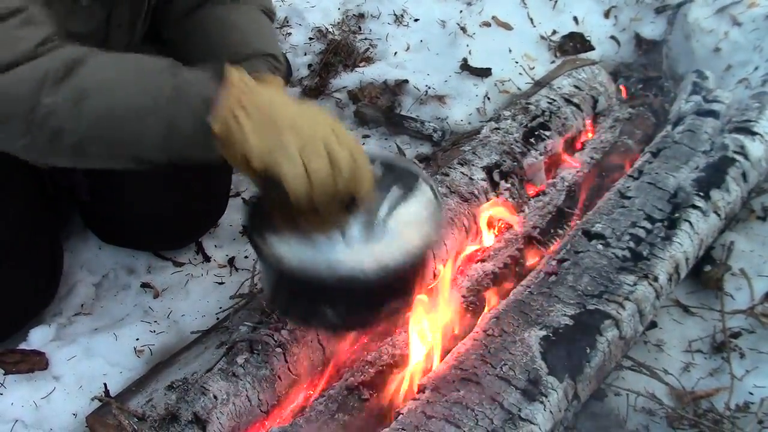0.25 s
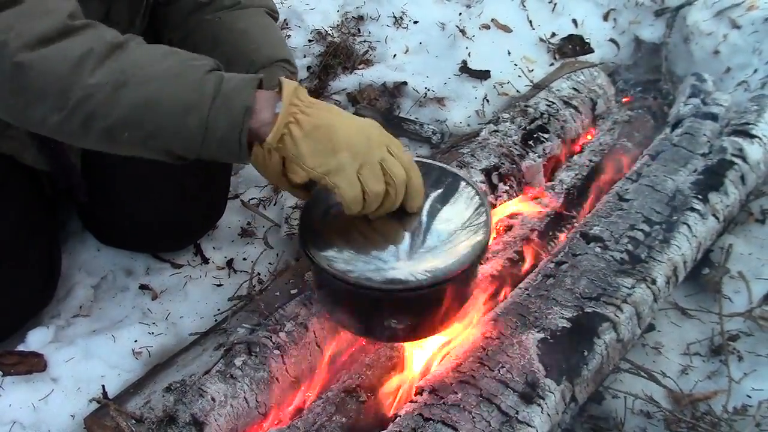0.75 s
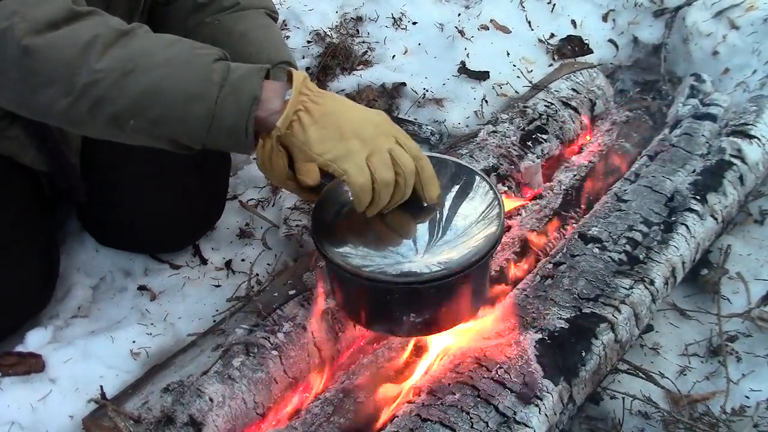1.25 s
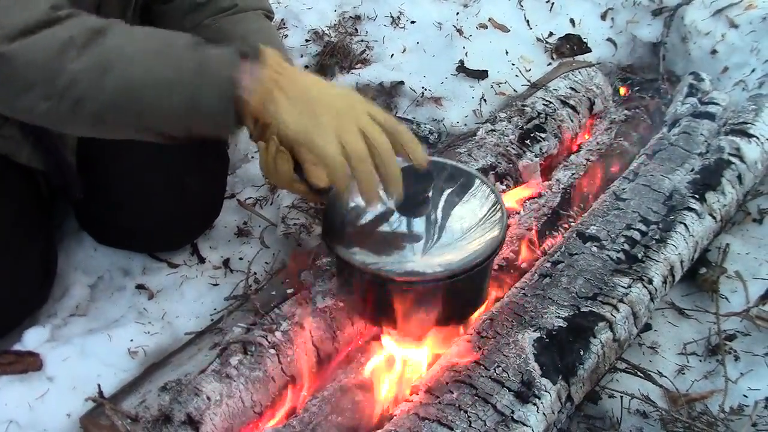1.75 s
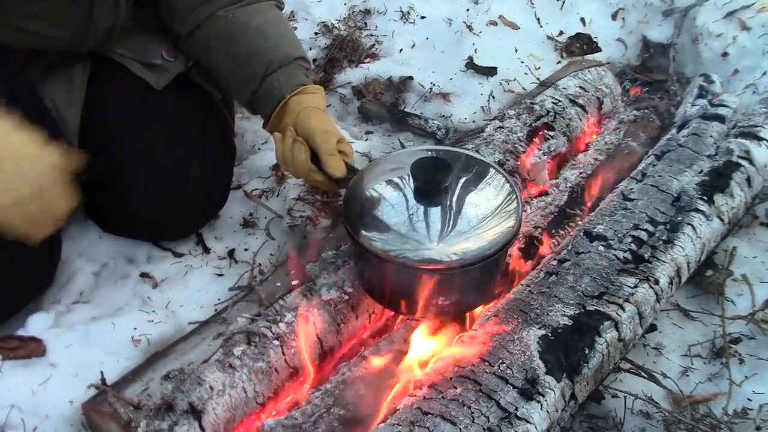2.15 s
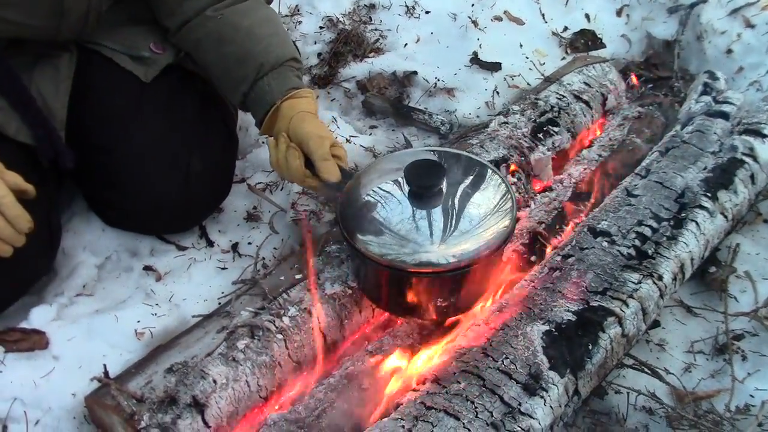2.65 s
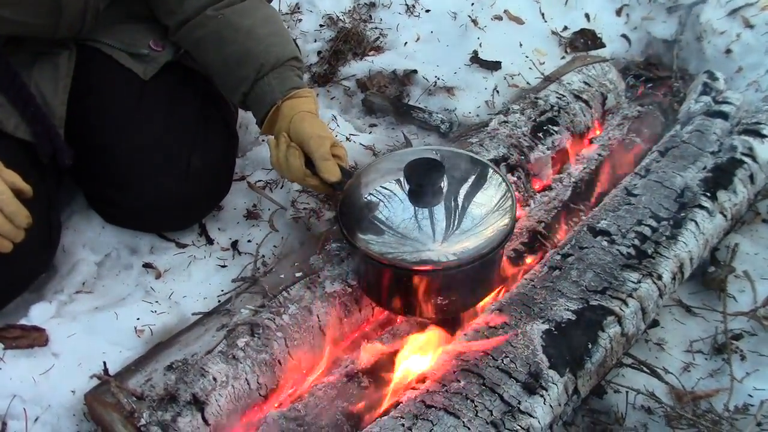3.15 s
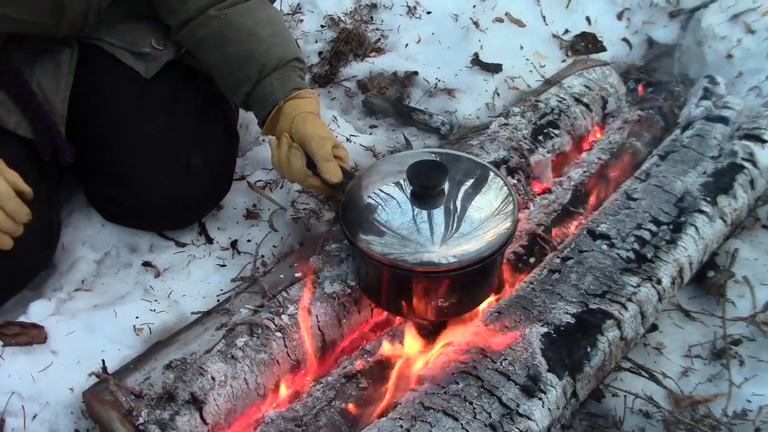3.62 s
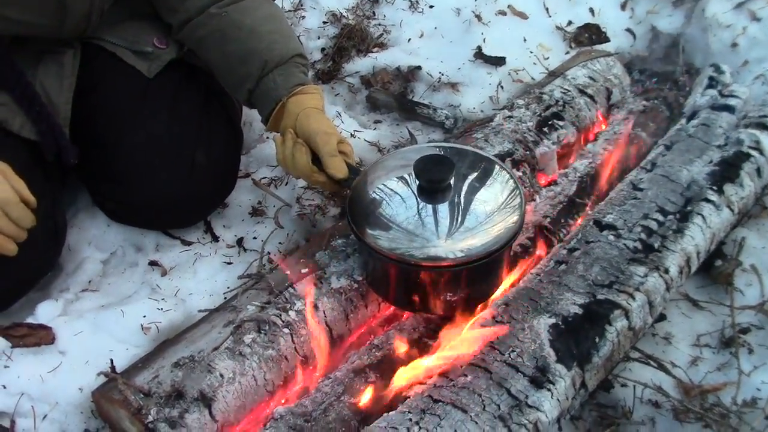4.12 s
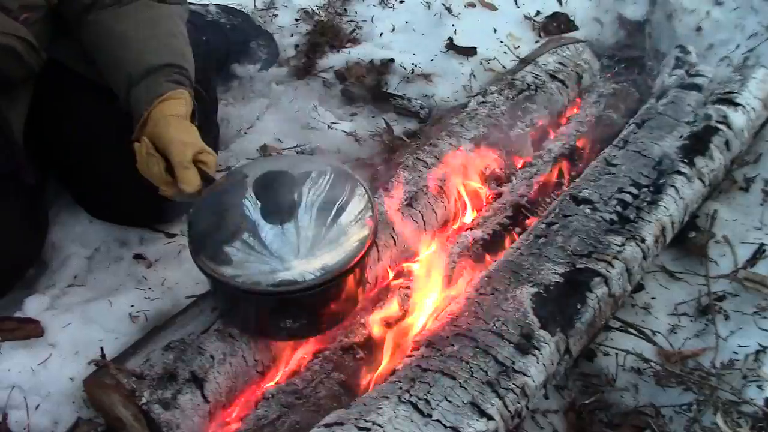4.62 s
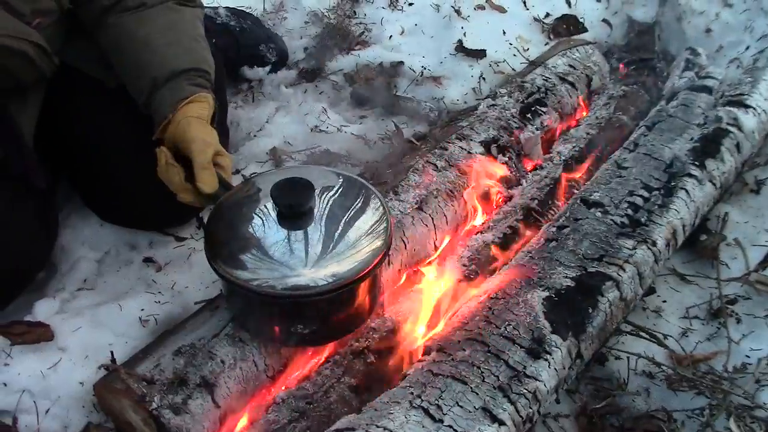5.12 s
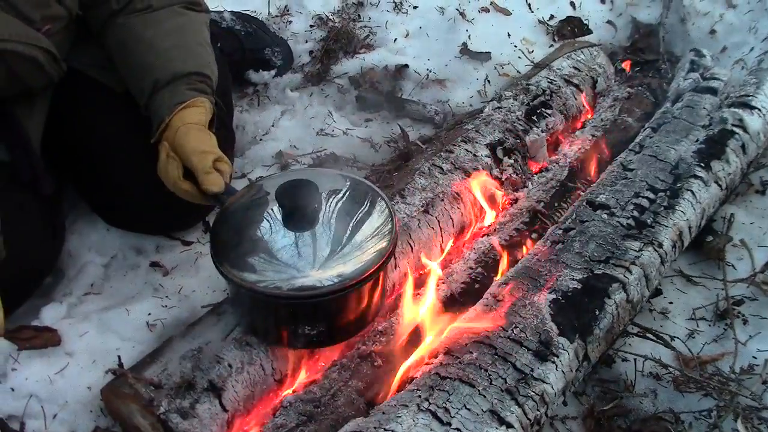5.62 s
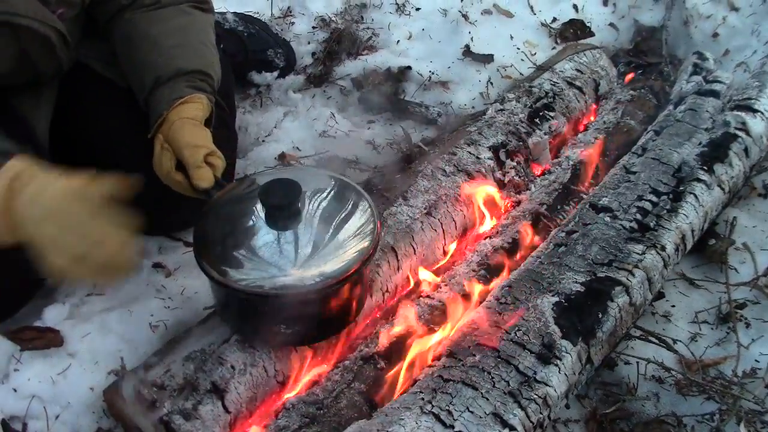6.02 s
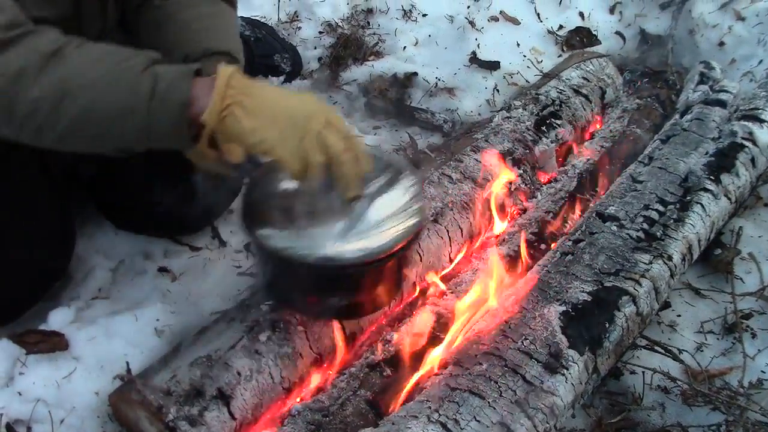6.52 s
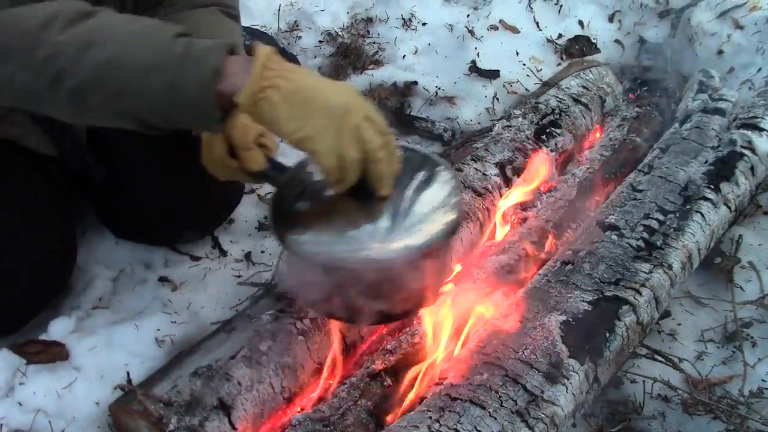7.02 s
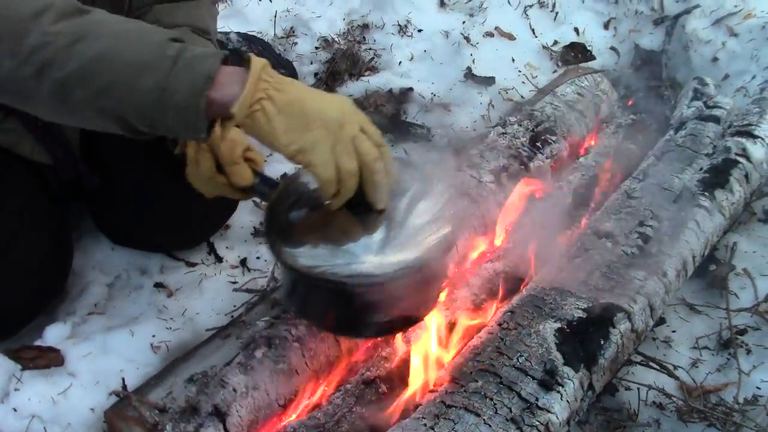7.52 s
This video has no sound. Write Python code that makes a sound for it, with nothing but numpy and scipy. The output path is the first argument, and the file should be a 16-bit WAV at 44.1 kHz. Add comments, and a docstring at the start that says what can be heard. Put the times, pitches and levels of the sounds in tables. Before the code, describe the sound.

Outdoors and close up, hard kernels swish back and forth in a shaken steel kettle, then settle. Oil sizzles and spits finely over soft fire flutter and small snaps, with a faint sleeve rustle. A brief dead silence cuts in, then corn pops sharply against the metal, pieces patter, steam hisses, and the lid clinks and rings, with popping thickening to the end.

```python
"""Campfire popcorn kettle

Kernels slide in a shaken, lidded steel kettle (swept click noise) over sizzling oil (jittered sines).
It rests while the fire flutters and snaps (filtered puffs and bursts). After a short silent gap kernels
burst (noise through kettle resonances), ricochet, and make the lid clink (damped modes) under steam."""
import sys
import numpy as np
from scipy import signal
from scipy.fft import rfft, irfft
from scipy.io import wavfile
from scipy.ndimage import uniform_filter1d

SR = 44100
rng = np.random.default_rng(int(sys.argv[2]) if len(sys.argv) > 2 else 0)


def waveform_to_disk(signal):
    """Save audio, clipped to [-1, 1], as 16-bit WAV at the path in sys.argv[1]."""
    frames = np.transpose(np.atleast_2d(signal))
    scaled = np.clip(frames, -1, 1) * 32767
    samples = np.round(scaled).astype(np.int16)
    wavfile.write(sys.argv[1], SR, samples)


N = 342392
TIME = np.arange(N) / SR
GAP_START_S, GAP_END_S = 4.338, 4.516


def undb(db):
    """Decibels to gain."""
    return 10 ** (np.asarray(db) / 20)


def unit(x):
    """Scale to rms 1."""
    return x / np.sqrt(np.mean(x ** 2) + 1e-20)


def fade(t, t60):
    """Exponential decay, 60 dB down at t60 seconds."""
    return np.exp(-np.log(1000) * t / t60)


def swell(s, rise_s, fall_s):
    """Gaussian rise to 1 at time s, Gaussian fall after it; widths are standard deviations."""
    return np.exp(-.5 * ((TIME - s) / np.where(TIME < s, rise_s, fall_s)) ** 2)


def add(out, s, sound):
    """Mix a sound in at time s."""
    i = max(int(s * SR), 0)
    out[i:i + len(sound)] += sound[:max(len(out) - i, 0)]


def band(x, edges_hz):
    """Causal band-pass."""
    return signal.sosfilt(signal.butter(3, edges_hz, "band", fs=SR, output="sos"), x)


def colour(x, spectrum):
    """Shape by (hz, db) points, straight lines over log frequency; rms 1."""
    hz, db = np.transpose(spectrum)
    bins_hz = np.maximum(np.arange(N // 2 + 1) * SR / N, 1)
    gain = undb(np.interp(np.log(bins_hz), np.log(hz), db))
    return unit(irfft(rfft(x) * gain, N))


def clicks(rate_hz, spread_db):
    """Tiny impacts at random moments, random in sign and uneven in size."""
    hits = rng.random(N) < rate_hz / SR
    sign = rng.choice([-1, 1], N)
    size_db = spread_db * np.clip(rng.standard_normal(N), -2, 2)
    return hits * sign * undb(size_db)


def droplets(start_s, end_s, pitch_hz, spread_octaves, count):
    """Tiny whistles at random moments; a wider pitch scatter also makes each one hissier."""
    out, t = np.zeros(N), TIME[:SR // 25]
    envelope = fade(t, .026) - fade(t, .003)
    jitter_rad = .1 + 2 * abs(spread_octaves)  # phase step per sample
    draws = np.clip(rng.standard_normal((count, 2)), -2, 2)
    for s, (size, detune) in zip(rng.uniform(start_s, end_s, count), draws):
        hz = min(pitch_hz * 2 ** (spread_octaves * detune), SR / 3)
        phase = 2 * np.pi * hz * t + jitter_rad * np.cumsum(rng.standard_normal(len(t)))
        add(out, s, undb(3 * size) * np.sin(phase) * envelope)
    return out


# damped resonances of kettle and enclosed air: pitch_hz, width_hz, level_db
KETTLE_MODES = [(206, 75, -4), (697, 164, 3), (1178, 220, -0.5), (1570, 59, -4.5), (1630, 51, 3),
                (1720, 470, -4.5), (2685, 75, 10.5), (3440, 160, -8), (6020, 210, 0.5), (7470, 340, 6.5),
                (8830, 1430, 1.5)]


def kettle(x, scatter_db=0):
    """Direct sound plus damped kettle resonances; scatter varies their levels with the place of the blow."""
    scatter = scatter_db * rng.standard_normal(len(KETTLE_MODES))
    out = x
    for (hz, width_hz, db), offset_db in zip(KETTLE_MODES, scatter):
        b, a = signal.iirpeak(hz, hz / width_hz, fs=SR)
        out = out + undb(db + offset_db) * signal.lfilter(b, a, x)
    return out


# thump, body, knock, crack, snap of a blow: low_hz, high_hz, t60_s, relative_db
BLOW_BANDS = [(67, 263, 0.022, 1.5), (528, 1780, 0.036, -2.5), (1208, 2560, 0.024, 2),
              (2050, 5200, 0.096, 1.5), (5560, 14300, 0.016, -1)]


def burst(strength_db, brightness_db_per_octave, thump_db, ring_hz, spike, tail_db, tail_t60_s,
          wall_share, ring_db=4.02, scatter_db=4):
    """Pressure spike, short decaying scatter and sparse rattle in five bands, plus one short resonance."""
    t = TIME[:SR // 4]
    pivot_hz, pivot_t60_s = 2500, .049

    def level_db(hz):
        """Strength tilted about the pivot."""
        return strength_db + brightness_db_per_octave * np.log2(hz / pivot_hz)

    ring_t60_s = pivot_t60_s * np.sqrt(pivot_hz / ring_hz)
    out = undb(level_db(ring_hz) + ring_db) * np.sin(2 * np.pi * ring_hz * t) * fade(t, ring_t60_s)
    for k, (low_hz, high_hz, t60_s, band_db) in enumerate(BLOW_BANDS):
        # the lowest band has its own level
        db = band_db + (thump_db if k == 0 else level_db(np.sqrt(low_hz * high_hz)))
        scatter, grit = rng.standard_normal((2, len(t)))
        rattle = unit(grit * (rng.random(len(t)) < .03))
        push = scatter * fade(t, t60_s) + undb(tail_db) * rattle * fade(t, tail_t60_s)
        push[0] -= spike
        blow = band((1 - wall_share) * push + wall_share * kettle(push, scatter_db), (low_hz, high_hz))
        # energy equal to rms 1 over 10 ms
        out = out + undb(db) * blow / np.sqrt(np.sum(blow ** 2) / (SR / 100))
    return out


# edges of the four level bands of the lid: edge_hz
LID_EDGES = [2400, 3000, 4300, 6100, 15500]
# strongest bending modes of the lid: pitch_hz, level_db, relative_t60 (x blow t60)
LID_MODES = [(2583, -5, 1), (2627, -4, .5), (2668, 0, 1.05), (2886, -20, 1.1), (3128, -18, .7),
             (3203, -11, .45), (3346, -9, .8), (3546, -13, 1), (3600, -14, 1), (3799, -5, 1.1),
             (4141, -12, 1), (4460, -7, .9), (4511, -9, .7), (4913, -6, .9), (5269, -9, .7),
             (5397, -8, .55), (5663, -18, .6), (5949, -10, .75), (6325, -18, .8), (6562, -16, .6),
             (7277, -12, .5), (7596, -19, .6), (7900, -17, .4), (8400, -19, .5), (8680, -20, .5),
             (10220, -23, .5), (11020, -24, .5), (11460, -22, .5), (12390, -26, .4)]


def lid(levels_db, t60_s, weak_db, weak_count):
    """Strong bending modes among weak short ones; random mode levels stand for the place of contact."""
    t = TIME[:SR * 3 // 5]
    weak_hz = rng.uniform(LID_EDGES[1], LID_EDGES[-1], weak_count)
    weak_levels_db = weak_db - 5 * np.log2(weak_hz / LID_EDGES[1])
    weak = np.transpose([weak_hz, weak_levels_db, np.full(weak_count, .55)])
    hz, db, life = np.vstack([LID_MODES, weak]).T[:, :, None]
    size, phase = rng.standard_normal((2, len(hz), 1))
    tones = np.sin(2 * np.pi * (hz * t + phase))
    modes = undb(db + 3.9 * size) * fade(t, t60_s * life) * tones
    out = 0
    for level_db, low_hz, high_hz in zip(levels_db, LID_EDGES, LID_EDGES[1:]):
        # the loose rim chatters on the pot and roughens the ring
        chatter = 1 + .13 * unit(band(rng.standard_normal(len(t)), (20, 300)))
        group = chatter * modes[((hz >= low_hz) & (hz < high_hz)).ravel()].sum(axis=0)
        out = out + undb(level_db) * group / np.std(group[:SR // 40])  # level over the first 25 ms
    return out


# resting lid, damped once the glove presses on it: time_s, t60_s
LID_DAMPING = [(6.1, 0.98), (6.3, 0.84)]
# kernels bursting or hitting the wall, strengths before trim; ring_hz depends on the place of the blow:
# start_s, strength_db, brightness_db_per_octave, thump_db, ring_hz
KERNELS = [(4.5176, -35.5, -4.6, -37, 7730.0), (4.5637, -46, 5.5, -48, 2750.0),
           (4.609, -30.0, 2, -40, 1650.0), (4.623, -56, 8, -65, 4480.0), (4.6549, -27.5, 0.5, -39, 1650.0),
           (4.724, -45, 3.5, -41.5, 1660.0), (4.7315, -39.5, 3.1, -47, 1650.0),
           (4.8208, -31.5, 3, -44, 7700.0), (4.8839, -33, -4.5, -43, 1580.0),
           (4.8933, -44.5, 7.5, -57, 1670.0), (4.99, -47.5, 2.5, -32, 1630.0),
           (5.2439, -35.5, 0, -37.5, 9010.0), (5.2972, -40.5, -4, -46, 3550.0),
           (5.4363, -41, 0.2, -40, 2880.0), (5.538, -35.5, 5, -36, 7530.0), (5.6048, -36, 0, -41, 4120.0),
           (5.6153, -35.5, 4.5, -50, 5610.0), (5.6634, -37.5, 4.5, -41.5, 1660.0),
           (5.8158, -30.0, 0, -26, 8810.0), (5.8412, -33, -0.5, -34.5, 4460.0),
           (5.976, -30, 1.5, -43.5, 3800.0), (6.0307, -35.5, 5.5, -45, 7270.0),
           (6.0596, -38, 3.5, -45, 7280.0), (6.177, -39.5, -0.8, -59, 2920.0),
           (6.21, -27, -2.5, -49, 1750.0), (6.223, -34.5, 2.3, -33, 1340.0),
           (6.346, -33.5, 1.5, -70, 2750.0), (6.3514, -33, -3.5, -25.5, 2750.0),
           (6.376, -35, 1, -55, 1690.0), (6.4098, -33.5, -0.7, -27, 7190.0),
           (6.4917, -40, 1.5, -42, 7170.0), (6.5174, -43.5, -1.5, -35, 7910.0),
           (6.6099, -52.5, 4.5, -81, 9030.0), (6.7993, -33.5, -5.5, -35, 1560.0),
           (6.8948, -27.5, 1.1, -29, 8830.0), (6.954, -26.5, 2.5, -38, 7150.0),
           (7.0691, -36, 1, -41, 4050.0), (7.15, -31.5, 8.5, -31.5, 9310.0),
           (7.1752, -34, 1.0, -37, 1640.0), (7.2405, -36.5, 0, -41, 1570.0),
           (7.285, -24.5, 2, -35.5, 5110.0), (7.312, -49.5, 3, -39, 4910.0),
           (7.3825, -42, 0.3, -51, 7520.0), (7.387, -28.5, 5, -44, 7520.0),
           (7.4237, -32, 0.5, -31.5, 5740.0), (7.481, -37, 2.5, -33.5, 7130.0),
           (7.596, -45.5, 0, -59, 2490.0), (7.6614, -49.5, 8, -53, 8810.0), (7.7315, -36, 6.5, -30, 8920.0)]


def popping(trim_db=-1, rebound_db=-10, lid_db=(-17, -22, -18, -28)):
    """Each kernel bursts and rebounds off the wall; harder ones also ring the resting lid."""
    out, t = np.zeros(N), TIME[:SR // 20]
    for s, db, brightness, thump_db, hz in KERNELS:
        pop = burst(db, brightness, thump_db, hz, spike=7, tail_db=-24, tail_t60_s=.33, wall_share=1)
        add(out, s, undb(trim_db) * pop)
        impact = rng.standard_normal(len(t)) * fade(t, .014)
        rebound = band(kettle(impact, scatter_db=6), (1200, 13000))
        delay_s = rng.uniform(.003, .012)
        add(out, s + delay_s, undb(db + rebound_db) * rebound / np.std(rebound[:SR // 100]))
        if db > -38:
            t60_s = np.interp(s, *np.transpose(LID_DAMPING))
            add(out, s, lid(db + np.array(lid_db), t60_s, weak_db=-11, weak_count=16))
    return out


def ricochets(level_db=-17, settle_t60_s=1.0, onset_t60_s=.026, contact_t60_s=.0039):
    """Each burst throws corn about; random contacts patter on the wall until it settles."""
    power, t = np.zeros(N), TIME[:SR // 2]
    for s, db, *_ in KERNELS:
        add(power, s, (undb(db) * (fade(t, settle_t60_s) - fade(t, onset_t60_s))) ** 2)
    contact = rng.standard_normal(len(t)) * fade(t, contact_t60_s)
    patter = signal.fftconvolve(clicks(rate_hz=130, spread_db=1), contact)[:N]
    return undb(level_db) * np.sqrt(power) * unit(band(kettle(patter), (900, 6500)))


# lid strikes the rim, overtone levels before the band trims:
# start_s, lowest_modes_db, overtones_db, brightness_db_per_band, t60_s
RIM_STRIKES = [(5.2778, -18.5, -43, -7, 0.63), (5.848, -20.5, -25, -2.5, 0.15),
               (5.913, -29, -36.5, -11, 0.46), (6.2625, -32.5, -46, 4, 0.18), (6.2803, -43, -34.5, 0, 0.31),
               (6.296, -23.5, -40, -5.5, 0.1), (6.8361, -26.5, -24.5, -7, 0.1),
               (6.9833, -19, -39.5, -7.5, 0.24), (7.4436, -27, -37, -2, 0.099)]


def clinking(overtone_trims_db=(0, 2, -1), tick_t60_s=.2):
    """The lid lifts and falls back on the rim: a hard tick that shudders the pot, then the lid's ring."""
    out, t = np.zeros(N), TIME[:SR // 4]
    for s, low_db, high_db, brightness, t60_s in RIM_STRIKES:
        overtones_db = high_db + np.array(overtone_trims_db) + brightness * np.arange(-1, 2)
        levels_db = [low_db, *overtones_db]
        add(out, s, lid(levels_db, t60_s, weak_db=-18, weak_count=130))
        tick = band(kettle(rng.standard_normal(len(t))), (1200, 12000)) * fade(t, tick_t60_s)
        add(out, s, undb(np.mean(levels_db)) * tick)
    return out


# sliding kernels: pitch_hz, level_db
SLIDE_SPECTRUM = [(1470, -14), (2500, -7.5), (2660, -18.5), (3030, -11.5), (3690, -2.5), (4750, -8),
                  (5490, -4), (9080, -1.5), (15500, -17.5)]
# tumbling kernels: pitch_hz, level_db
TUMBLE_SPECTRUM = [(120, -5), (200, 1.5), (347, -9), (658, -12.5), (1560, -6), (2060, -14.5), (2640, -4),
                   (4000, -16), (5200, -32), (8800, -120)]
# kettle swings: fastest_slide_s, hiss_db, landing_lag_s, landing_db
KETTLE_SWINGS = [(0.005, -37, 0.091, -41.5), (0.218, -35.5, 0.032, -47), (0.477, -34.5, 0.056, -43.5),
                 (0.69, -38, 0.0088, -62), (0.799, -43, 0.0024, -44)]


def shaking(skid_db=-45, scrape_db=-45, roll_db=-48, rise_s=.024, fall_s=.042, landing_s=.011):
    """Hard kernels scrape, skid and roll over the bottom; each swing rushes them across to the wall."""
    shake_end_s, settle_db_per_s = .54, 16.5
    moving = undb(-settle_db_per_s * np.maximum(TIME - shake_end_s, 0))
    hiss_power = (undb(skid_db) * moving) ** 2
    knock_power = (undb(roll_db) * moving ** 2) ** 2  # rolling dies twice as fast in dB
    for s, hiss_db, lag_s, landing_db in KETTLE_SWINGS:
        hiss_power = hiss_power + (undb(hiss_db) * swell(s, rise_s, fall_s)) ** 2
        landing = swell(s + lag_s, landing_s, landing_s)
        knock_power = knock_power + (undb(landing_db) * landing) ** 2
    slide = colour(clicks(rate_hz=6000, spread_db=3.5), SLIDE_SPECTRUM)
    tumble = colour(clicks(rate_hz=400, spread_db=4), TUMBLE_SPECTRUM)
    hiss = np.sqrt(hiss_power) * unit(slide + kettle(slide))
    knocks = np.sqrt(knock_power) * unit(kettle(tumble))
    # fine high scrape, strongest while the shaking is hardest
    scrape_noise = unit(band(rng.standard_normal(N), (9000, 15500)))
    scrape = undb(scrape_db) * swell(.091, rise_s=.1, fall_s=.56) * scrape_noise
    return hiss + knocks + scrape


def sizzle(start_db=-46.5, calm_start_s=2.62, calm_db_per_s=30, floor_db=-56):
    """Water droplets spit out of the oil as short jittered tones; they soften as the kettle rests."""
    falling_db = start_db - calm_db_per_s * np.maximum(TIME - calm_start_s, 0)
    level_db = np.maximum(falling_db, floor_db)
    return undb(level_db) * droplets(0, N / SR, pitch_hz=8440, spread_octaves=.18, count=1100)


# louder oil spits, levels before trim: start_s, level_db, centre_hz
OIL_SPITS = [(0.886, -27.5, 9100), (1.506, -38, 8500), (1.789, -33, 9000), (1.819, -33, 8950),
             (2.2643, -33.5, 8000), (2.5406, -38, 8260), (2.5765, -35, 8450), (2.924, -34, 8060),
             (3.0315, -37, 6640), (3.068, -35, 7560), (3.1652, -37, 10400), (3.38, -34, 8950)]


def spits(trim_db=-11, rise_t60_s=.0031, fall_t60_s=.075):
    """A water drop flashes to steam in the oil with a short band of hiss."""
    out, t = np.zeros(N), TIME[:SR // 10]
    envelope = fade(t, fall_t60_s) - fade(t, rise_t60_s)
    for s, db, hz in OIL_SPITS:
        hiss = unit(band(rng.standard_normal(len(t)), (.8 * hz, 1.2 * hz)))
        add(out, s, undb(db + trim_db) * hiss * envelope)
    return out


def whistle(start_s=4.52, end_s=5.8, pitch_hz=7850, sputter_db=-44, hiss_db=-53):
    """Wet steam sputters through the lid gap: uneven spurts near one pitch inside a fine hiss."""
    wander = unit(uniform_filter1d(rng.standard_normal(N), size=3000))
    spurts = undb(3 * np.clip(wander, -2, 1))
    venting = uniform_filter1d(1. * ((TIME > start_s) & (TIME < end_s)), size=6000)
    hiss = undb(hiss_db) * venting * unit(band(rng.standard_normal(N), (7200, 12000)))
    sputter = droplets(start_s, end_s, pitch_hz, spread_octaves=.018, count=160)
    return hiss + undb(sputter_db) * spurts * sputter


# steaming kettle: pitch_hz, level_db
STEAM_SPECTRUM = [(59, -31), (100, -27), (275, -6.5), (362, -14), (627, -8.5), (1960, -22), (2630, -19.5),
                  (5280, -31), (7730, -21), (15500, -29)]


def steam(steam_db=-54, shift_db=-58):
    """From the gap on, steam fizzes under the lid (dense clicks) and light flakes shift and tick."""
    fizz = colour(clicks(rate_hz=5000, spread_db=4), STEAM_SPECTRUM)
    flakes = unit(band(kettle(clicks(rate_hz=80, spread_db=4)), (600, 10000)))
    return (undb(steam_db) * fizz + undb(shift_db) * flakes) * (TIME > GAP_START_S)


# snaps and knocks around the fire, strengths before trim:
# start_s, strength_db, brightness_db_per_octave, thump_db, ring_hz
FIRE_SNAPS = [(1.0206, -51.5, 1.8, -65, 7320.0), (2.6413, -52, -1.5, -40.5, 4510.0),
              (3.2692, -53, 8, -67, 5970), (3.285, -62, -3, -65, 1850.0), (3.651, -61, -4, -68, 1440.0),
              (3.754, -57.5, -0.5, -75, 7260), (3.8781, -46.5, -4, -57, 1477),
              (3.898, -54, -3, -56, 1480.0), (3.9599, -54, 0.9, -63, 1650.0),
              (4.1688, -49.5, 0.5, -66, 2190), (4.219, -56, 5, -73, 6090.0)]


def fire(trim_db=-1, flutter_db=-58, crackle_db=-69):
    """Flames flap in soft low puffs; logs tick (decaying noise) and now and then snap."""
    t = TIME[:SR // 20]
    puff = np.sin(2 * np.pi * 175 * t) * fade(t, .021)
    puffs = signal.fftconvolve(clicks(rate_hz=22, spread_db=5), puff)[:N]
    tick = rng.standard_normal(len(t)) * fade(t, .022)
    ticks = signal.fftconvolve(clicks(rate_hz=14, spread_db=17), tick)[:N]
    flutter = undb(flutter_db) * unit(band(puffs, (60, 290)))
    crackle = undb(crackle_db) * unit(band(ticks, (1000, 11000)))
    out = flutter + crackle
    for s, *blow in FIRE_SNAPS:
        snap = burst(*blow, spike=5, tail_db=-17, tail_t60_s=.1, wall_share=.1, ring_db=9.02)
        add(out, s, undb(trim_db) * snap)
    return out


# rubbing cloth: pitch_hz, level_db
CLOTH_SPECTRUM = [(150, -39), (250, -4), (289, -9), (358, -12), (634, -0.5), (983, -8.5), (3210, -8),
                  (6000, -16), (7800, -36), (13200, -120)]
# sleeve and glove rubs: middle_s, width_s (standard deviation), level_db
CLOTH_RUBS = [(1.282, 0.033, -59), (1.86, 0.037, -60), (2.173, 0.14, -49.5), (2.53, 0.063, -57.5),
              (2.713, 0.055, -55)]


def sleeve(scuff_db=.5):
    """Coat and glove rub in small uneven scuffs of clicks as the hand lets go of the lid."""
    scuffs = unit(uniform_filter1d(rng.standard_normal(N), size=700))
    rubbing = sum(undb(db) * swell(s, width_s, width_s) for s, width_s, db in CLOTH_RUBS)
    cloth = colour(clicks(rate_hz=1500, spread_db=2), CLOTH_SPECTRUM)
    return rubbing * undb(scuff_db * scuffs) * cloth


def outdoors(x, bass_db=-15, low_db=-9, middle_db=-18, high_db=-17, t60_s=.063):
    """Logs and trodden snow return an early noise-like scatter, band by band."""
    t = TIME[:SR // 10]
    echo = rng.standard_normal(len(t)) * fade(t, t60_s)
    scatter = signal.fftconvolve(x, echo / np.linalg.norm(echo))[:N]
    bands = [(bass_db, (70, 240)), (low_db, (230, 800)), (middle_db, (900, 1700)), (high_db, (4000, 15500))]
    return sum(undb(db) * band(scatter, edges_hz) for db, edges_hz in bands)


# fire and open air: pitch_hz, level_db
AIR_SPECTRUM = [(15, -46), (25, -10.5), (35, -18), (55, -18), (126, -17.5), (359, -26), (1050, -29.5),
                (1300, -30.5), (1530, -28), (1660, -31.5), (2630, -31.5), (4870, -35.5), (7500, -33),
                (15500, -40)]


def open_air(level_db):
    """Steady rumble and hiss of fire and open air: shaped noise."""
    return undb(level_db) * colour(rng.standard_normal(N), AIR_SPECTRUM)


def scene():
    """Sources straight ahead; scatter and part of the air are opposite in the two channels."""
    corn = popping() + ricochets() + clinking() + shaking()
    oil_and_steam = sizzle() + spits() + whistle() + steam()
    near = corn + oil_and_steam + fire() + sleeve()
    mid = near + open_air(level_db=-53)
    side = outdoors(near) + open_air(level_db=-59)
    return np.array([mid + side, mid - side])


def record(dry):
    """Round the peaks, add a small steady offset, silence the gap and cut the top."""
    offset, ceiling, top_hz = .0103, .85, 16000
    running = uniform_filter1d(1. * ((TIME < GAP_START_S) | (TIME > GAP_END_S)), size=90)
    rounded = ceiling * np.tanh(dry / ceiling)
    low_pass = signal.ellip(8, .2, 70, top_hz, fs=SR, output="sos")
    return signal.sosfilt(low_pass, (rounded + offset) * running)


dry = scene()
out = record(dry)
waveform_to_disk(out)
```